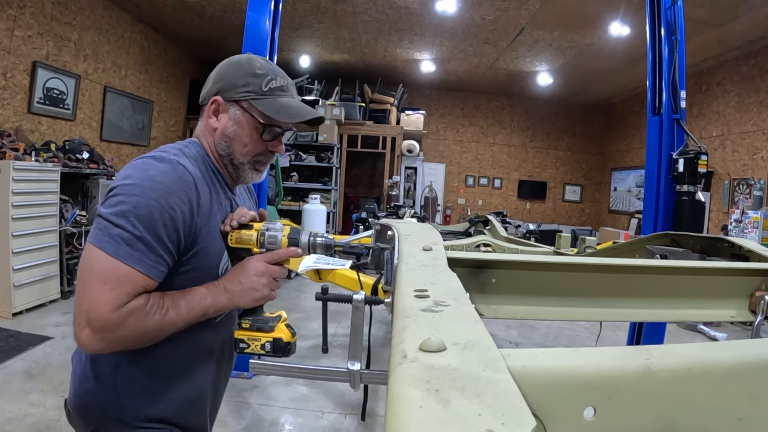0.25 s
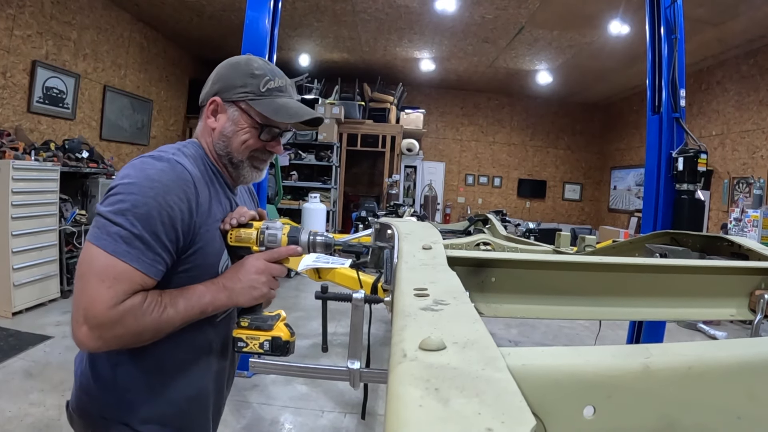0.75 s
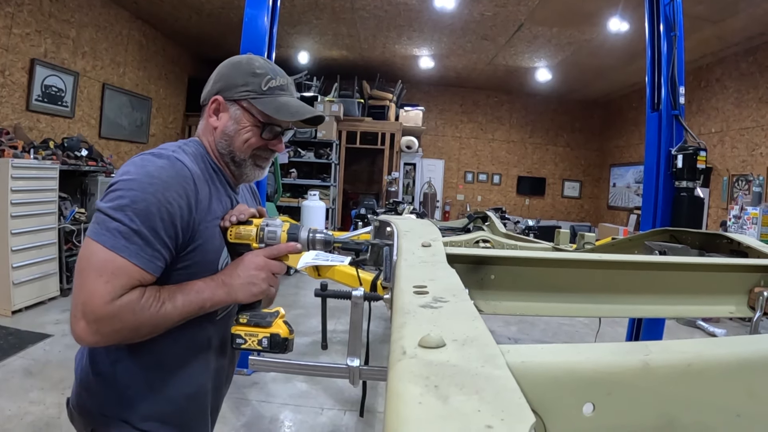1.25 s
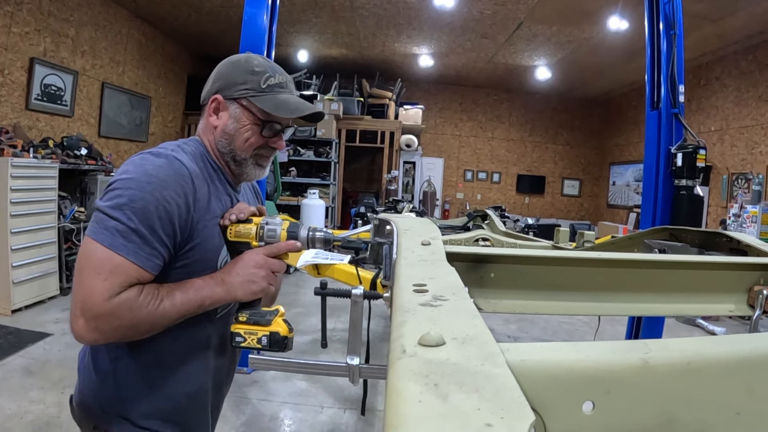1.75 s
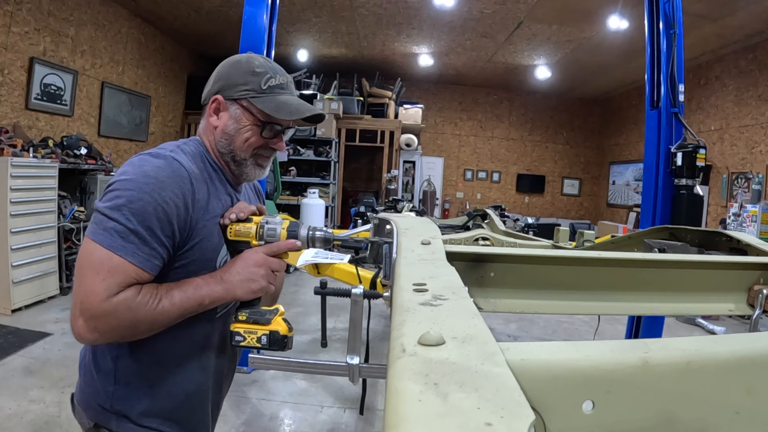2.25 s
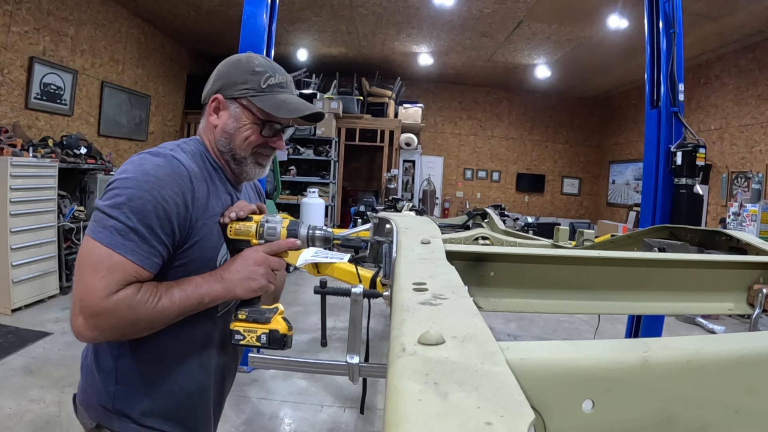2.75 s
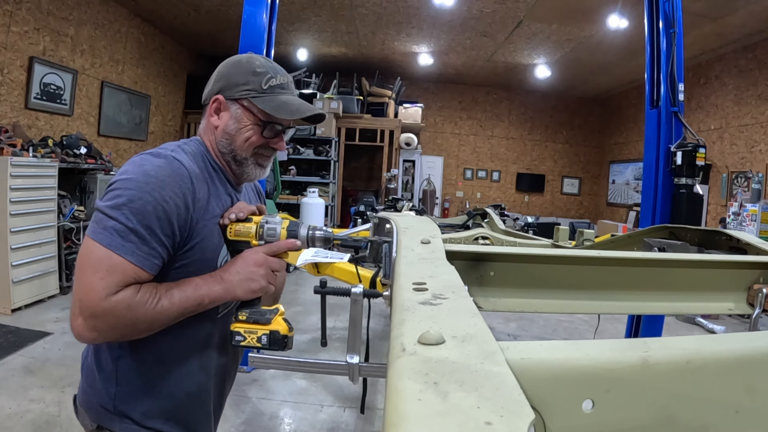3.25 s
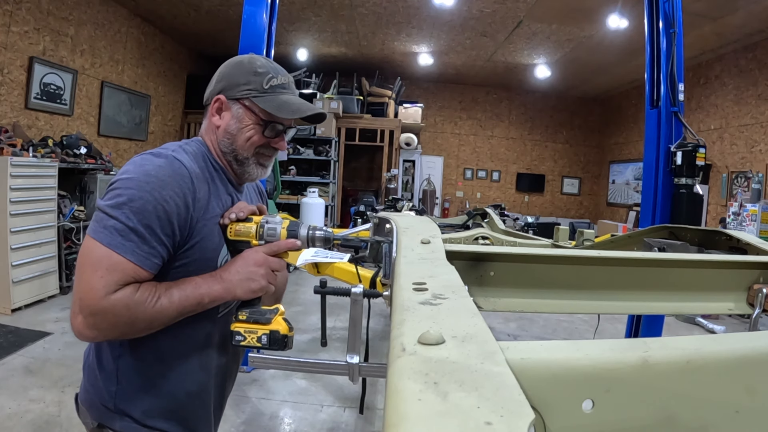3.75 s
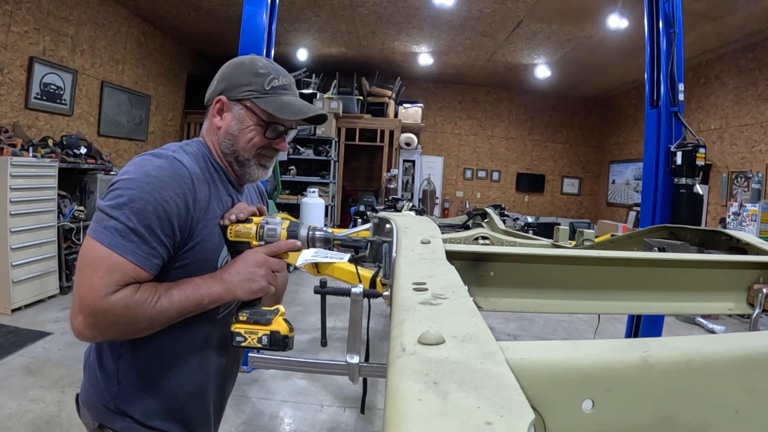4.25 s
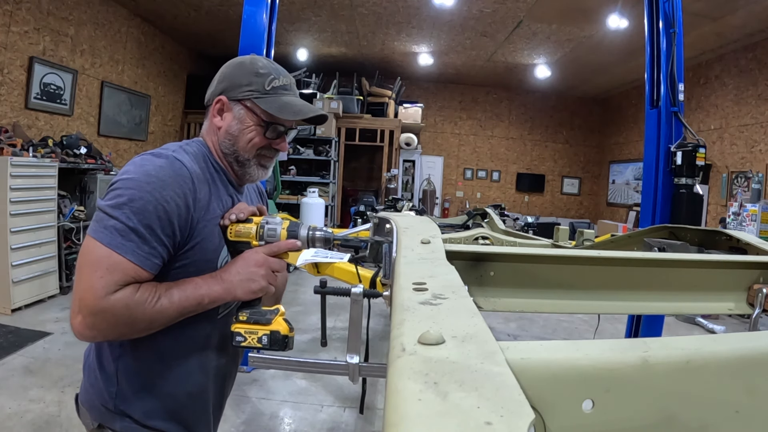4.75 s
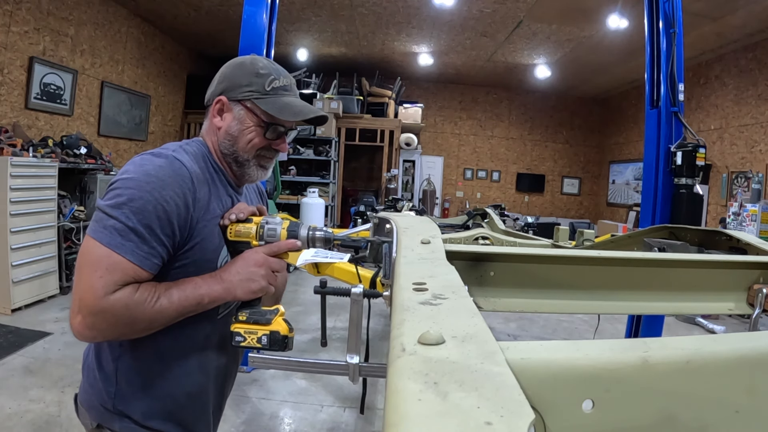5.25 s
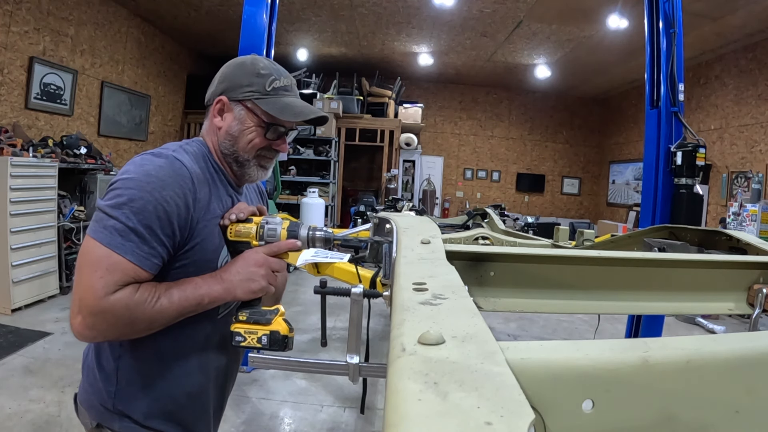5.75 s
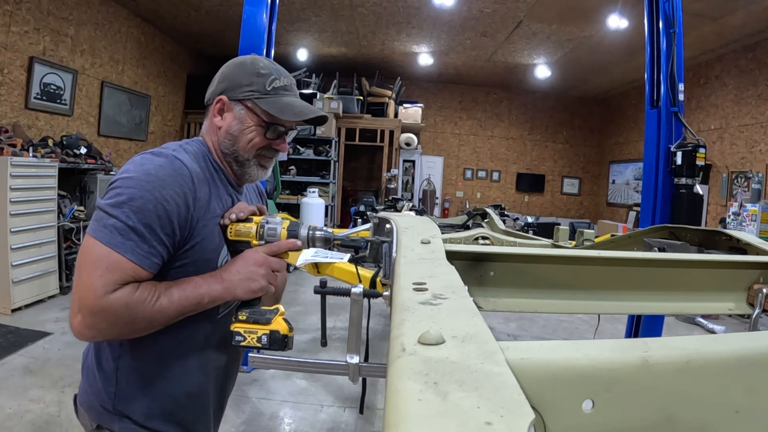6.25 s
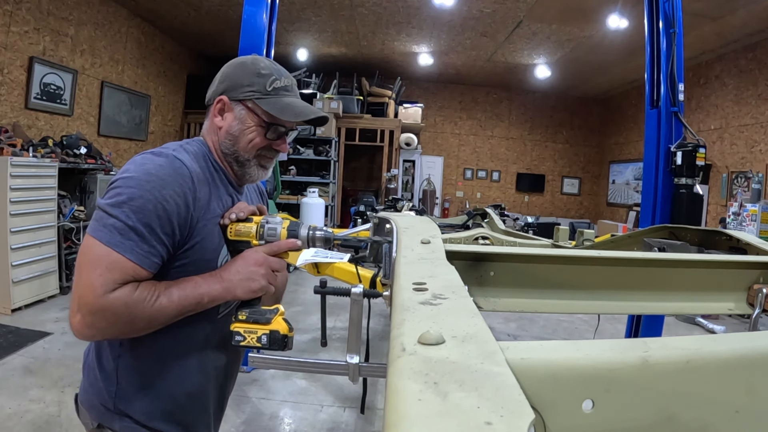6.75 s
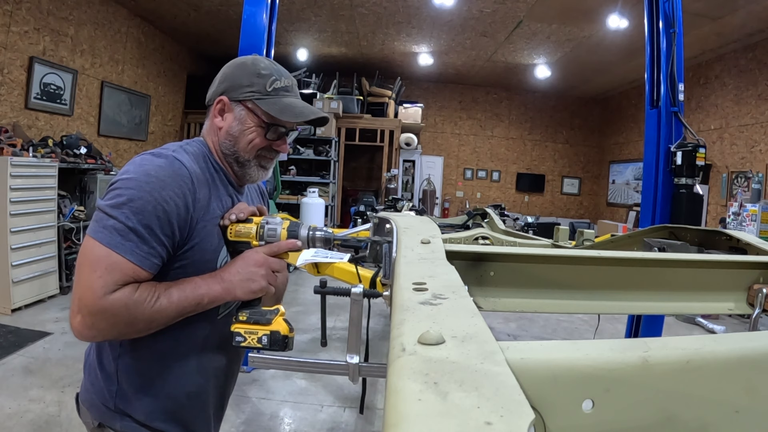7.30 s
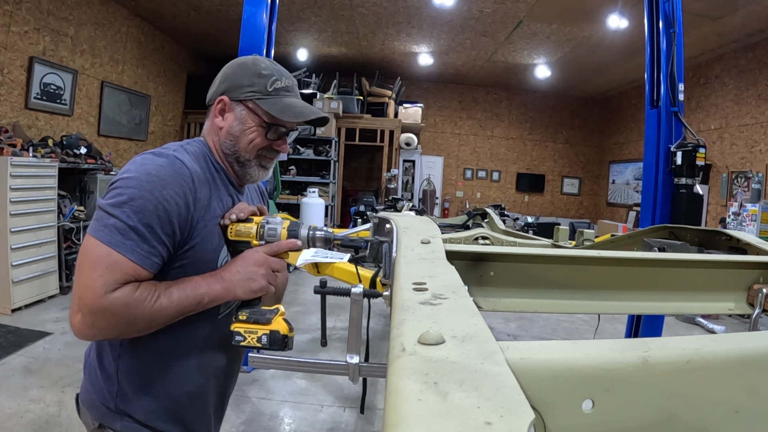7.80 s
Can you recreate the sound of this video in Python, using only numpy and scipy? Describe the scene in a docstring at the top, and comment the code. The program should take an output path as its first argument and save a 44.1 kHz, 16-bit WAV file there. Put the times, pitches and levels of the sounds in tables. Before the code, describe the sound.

A cordless drill starts at once, its motor whine sweeping up within about 0.3 seconds and then holding near full speed. At 0.1 seconds there is a hard, bright metallic clink as the bit bites, and a dull thump near 0.35. Dense gritty grinding follows without a break, a midrange ringing of the steel frame with rasp, hiss and sizzle. A high, jittery squeal near 5 kHz sinks slowly toward 4.4 kHz and grows louder. Around 3.8 to 4.6 seconds a rough shaving scrape dips and rises, with shrieks at 4.1 and a thump near 4.5. More grabs and shrieks come at 4.6 to 5.1, near 6, and most piercingly at 7.6, with a bright crackle. Drilling continues to the end at 8 seconds. Close, clipped sound on the left with short garage echo; faint boxy hum and noise on the right.

```python
"""Drill boring into steel

A cordless drill spins up and bores into a steel frame in a garage. Sines locked to the shaft make the whine;
showers of tiny random clicks, filtered, make the ringing, rasp and hiss of the cut; a jittery sine makes
the squeal, which comes in bursts and grows with depth. Shrieks, drones, scrapes, thumps and a clink join in.
The left channel is driven to its limit; the right holds only a faint boxy hum and a noise floor.
"""
import sys
import numpy as np
from scipy import signal
from scipy.fft import rfft, irfft, next_fast_len
from scipy.io import wavfile
from scipy.ndimage import uniform_filter1d, minimum_filter1d, map_coordinates

SR = 44100
rng = np.random.default_rng(int(sys.argv[2]) if len(sys.argv) > 2 else 0)


def inscribe(sig):
    """Save sig as 16-bit PCM at rate SR to the path in sys.argv[1].

    A 1-D sig is mono; a 2-D sig holds one channel per row.
    Samples are clipped to [-1, 1] before scaling.
    """
    pcm = np.round(np.clip(np.atleast_2d(sig).T, -1, 1) * 32767)
    wavfile.write(sys.argv[1], SR, pcm.astype(np.int16))


N = 354123
T = np.arange(N) / SR   # time of every sample, s
# Table levels are relative: the functions trim them and scene() sets the final loudness.


def from_db(db):
    """Turn decibels into a gain."""
    return 10 ** (np.asarray(db) / 20)


def rms_one(x):
    """Scale a sound to an average strength (rms) of 1."""
    return x / np.sqrt(np.mean(x ** 2) + 1e-20)


def in_time(rows):
    """Draw straight lines between a table's rows: each column at every sample."""
    s, *columns = np.transpose(rows)
    return [np.interp(T, s, column) for column in columns]


def drift(rate):
    """Smooth random wandering with about `rate` new values a second; rms 1."""
    knots = rng.standard_normal(N // 8)
    return rms_one(map_coordinates(knots, [T * rate], order=2, mode="wrap"))


def coloured(x, spectrum):
    """Filter x so that some pitches are louder than others, as the table says; rms 1."""
    hz, db = np.transpose(spectrum)
    size = next_fast_len(N, True)
    bins = np.maximum(np.arange(size // 2 + 1) * SR / size, 1)
    gain = from_db(np.interp(np.log(bins), np.log(hz), db))
    return rms_one(irfft(rfft(x, size) * gain, size)[:N])


def resonate(x, hz, width):
    """Let x ring one resonance: the narrower its width in Hz, the longer it rings; rms 1."""
    r = np.exp(-np.pi * abs(width) / SR)
    return rms_one(signal.lfilter([1, 0, -1], [1, -2 * r * np.cos(2 * np.pi * hz / SR), r * r], x))


def turns(per_s):
    """Angle in radians of something turning at this many turns per second."""
    return 2 * np.pi * np.cumsum(per_s) / SR


def phase_walk(width):
    """Random wandering of phase that smears a tone over about `width` Hz."""
    return turns(.5 * width * drift(3 * abs(width)))


def levelled(x, seconds):
    """Even out the strength over this time, keeping faster flutter."""
    return x / np.sqrt(np.abs(uniform_filter1d(x ** 2, max(int(seconds * SR), 8))) + 1e-9)


GARAGE_T60_S = 0.5   # time for the echo to fade by 60 dB


def garage(x, wet_db):
    """Direct sound plus the room: a dense, dying tail of reflections made from fading noise."""
    t = T[:SR // 2]
    tail = rng.standard_normal(len(t)) * from_db(-60 * t / GARAGE_T60_S) * (t > .004)
    return x + from_db(wet_db) * signal.fftconvolve(x, tail / np.linalg.norm(tail))[:N]


# speeds in turns per s: a ramp from the trigger pull, then a slow approach to the top
TOP_SPEED, START_SPEED, RAMP_PER_S = 387.6, 115, 1500
CREEP_SPEED, CREEP_S = 130, .165
WAVER_SPEED = 0.3525
GEAR_RATIO = 17.2   # rotor turns per spindle turn


def motor_speed():
    """Rotor turns per second: a quick ramp, a slow creep to the top and a slight random waver."""
    creep = TOP_SPEED - CREEP_SPEED * np.exp(-T / CREEP_S)
    return np.minimum(START_SPEED + RAMP_PER_S * T, creep) + WAVER_SPEED * drift(5)


def chips(bite, per_s, spread_db, wet_db):
    """Tiny fractures: random clicks of uneven size, as strong as the lips bite, in the garage."""
    born = rng.random(N) < per_s / SR
    sizes = from_db(spread_db * np.minimum(rng.exponential(1, N), 4)) * rng.choice([-1, 1], N)
    return garage(born * sizes * bite, wet_db)


# force of the cut: t/s, frame level/dB, rasp level/dB
CUT_FORCE = [(0.0, -41, -45), (0.09, -33.5, -32.5), (0.15, -30.5, -35.5), (0.44, -29, -32.5),
             (1.49, -28, -28), (2.78, -26.5, -28.5), (2.96, -28, -29.5), (3.01, -26, -28.5),
             (3.92, -26, -25), (4.03, -27.5, -29), (4.39, -26, -23.5), (5.3, -28, -28.5),
             (5.39, -29.5, -28), (5.64, -29.5, -30), (6.48, -26.5, -26.5), (6.66, -27.5, -27),
             (7.31, -26.5, -28.5), (8.0, -27, -23.5)]
# loudness of the treble, which flares briefly at 7.61 s: t/s, hiss level/dB, sizzle control level/dB
TREBLE_LEVELS = [(0.0, -59, -67), (0.11, -41.5, -51.5), (0.4, -39.5, -50.5), (2.22, -35.5, -47),
                 (3.46, -39.5, -49.5), (4.33, -34, -43), (4.53, -36.5, -47), (4.77, -33.5, -45.5),
                 (5.44, -38, -51), (5.64, -37.5, -50), (6.57, -40.5, -56.5), (7.06, -38.5, -52),
                 (7.59, -40, -52), (7.61, -39, -41), (7.7, -39, -51), (7.97, -38, -47)]
# body of the frame: f/Hz, level/dB per Hz
FRAME_BODY = [(25, -39), (75, -48), (160, -27.5), (280, -18), (420, -4.5), (620, -1), (800, 5), (1000, 2.5),
              (1450, 4.5), (1900, 2.5), (2200, -8), (2700, -26), (4000, -29)]
# ringing notes of the frame: f/Hz, width/Hz, level/dB relative to the body
FRAME_MODES = [(119.4, 6.6, -49.5), (237, 32, -47), (387, 15, -29.5), (477, 16, -31.5), (635, 26, -25.5),
               (813, 36, -15.5), (1650, 29, -31), (1936, 38, -40)]
# rasp in the hole: f/Hz, level/dB per Hz
RASP_SPECTRUM = [(1800, -51), (2700, -5.5), (2880, 0), (3200, -1), (3600, 3.5), (3950, -0.5), (4600, 0.5),
                 (5100, -3), (5600, -12), (6500, -36)]
# growl of the cut: f/Hz, level/dB per Hz
GROWL_SPECTRUM = [(1400, -43), (1950, 8), (2100, 6), (2280, 4), (2480, 8.5), (2680, -1.5), (2850, 6),
                  (3100, 4.5), (3800, -26)]
# hiss: f/Hz, level/dB per Hz
HISS_SPECTRUM = [(3500, -21), (5000, 7.5), (5700, 4), (6500, 1.5), (8200, 1), (9400, -8.5), (11000, -32),
                 (16000, -35)]
# sizzle, the highest part: f/Hz, level/dB per Hz
SIZZLE_SPECTRUM = [(7000, -14), (9500, 8), (12500, 7), (14000, 6), (16000, -14)]
# growl and sizzle both follow the sizzle control: level at its median (dB), share of its swing
GROWL_DB, GROWL_FOLLOWS = -32, 0.8
SIZZLE_DB, SIZZLE_FOLLOWS = -50, 1.6


def grinding(speed):
    """Two lips bite per spindle turn; clicks ring the frame, rasp in the hole, growl, hiss and sizzle."""
    frame_db, rasp_db = in_time(CUT_FORCE)
    hiss_db, control_db = in_time(TREBLE_LEVELS)
    swing_db = control_db - np.median(control_db)
    growl_db = GROWL_DB + GROWL_FOLLOWS * swing_db
    sizzle_db = SIZZLE_DB + SIZZLE_FOLLOWS * swing_db

    rotor = turns(speed)
    spindle = rotor / GEAR_RATIO
    spindle_db = 0.3 * np.sin(spindle) + 0.29 * np.sin(2 * spindle)
    bite = from_db(spindle_db + 0.48 * np.sin(rotor) + 0.67 * drift(30))

    blows = chips(bite, per_s=7000, spread_db=2.5, wet_db=-6.5)
    frame = coloured(blows, FRAME_BODY)
    for hz, width, db in FRAME_MODES:
        frame = frame + from_db(db) * resonate(blows, hz, width)

    scrapes = chips(bite, per_s=9000, spread_db=3.5, wet_db=-8)
    # the louder the hiss, the more unevenly it chatters
    chatter = from_db(np.clip(hiss_db + 39, 0, 9) * 0.073 * drift(130))
    dense_clicks = chips(bite * chatter, per_s=14000, spread_db=2.5, wet_db=-8.5)

    ringing = from_db(frame_db + 1.08) * frame
    rasp = from_db(rasp_db + 3.5) * coloured(scrapes, RASP_SPECTRUM)
    growl = from_db(growl_db) * coloured(dense_clicks, GROWL_SPECTRUM)
    hiss = from_db(hiss_db + 2.5) * coloured(dense_clicks, HISS_SPECTRUM)
    sizzle = from_db(sizzle_db) * coloured(scrapes, SIZZLE_SPECTRUM)
    return ringing + rasp + growl + hiss + sizzle


# brief dips of the 8th order: t/s of the middle, length/s
DROPOUTS = [(0.818, .11), (.97, .09), (1.31, .07), (1.49, 0.057), (1.7, 0.049), (1.827, 0.048),
            (2.53, 0.062), (3.3, 0.097), (3.53, 0.074), (4.161, 0.077), (4.44, .08), (5.348, 0.15),
            (5.85, .1), (6.24, 0.073), (6.85, .1), (7.66, .09)]
DROPOUT_DB = -7
# light pulses: rate, spread of the rate, depth 0-1
PULSE_HZ, PULSE_SPREAD_HZ, PULSE_DEPTH = 8.7, 7.8, 0.2


def pulsing():
    """Gain of the 8th order: light uneven pulses and a few deeper dropouts."""
    wave = np.sin(2 * np.pi * PULSE_HZ * T + phase_walk(PULSE_SPREAD_HZ))
    light = 1 - PULSE_DEPTH * np.maximum(wave, 0) ** 2
    gone = sum(np.exp(-2 * (2 * (T - s) / length) ** 2) for s, length in DROPOUTS)
    return light * from_db(DROPOUT_DB * gone)


# loudness of the whine (order = cycles per rotor turn): t/s, 4th order level/dB, 8th order level/dB
WHINE_LEVELS = [(0, -58, -45), (.1, -30.5, -45), (.24, -33, -38), (.42, -32, -34.5), (.52, -32.5, -28),
                (.9, -30.5, -31), (2.7, -31, -30.5), (3.3, -29.5, -29), (3.8, -32, -29.5),
                (3.95, -30, -25.5), (4.12, -37.5, -36), (4.35, -33, -28.5), (4.63, -32.5, -29.5),
                (4.85, -39.5, -31), (5.7, -37.5, -33.5), (6.6, -39, -35), (6.93, -29.5, -34),
                (7.1, -42, -32), (7.75, -39, -38.5), (8.03, -34, -27.5)]
# lesser tones of rotor and gears: multiple of motor speed, level/dB relative to 4th order, width/Hz
GEAR_TONES = [(3, -25, 8.2), (4.652, -7, 12), (7.408, -26, 7.2), (9.235, -6.5, 32), (12, -22, 14)]


def whine(speed):
    """Motor and gear tones locked to one shaft, trembling with the load at every spindle turn."""
    fourth_db, eighth_db = in_time(WHINE_LEVELS)
    load = np.sin(turns(speed) / GEAR_RATIO)
    rotor = turns(speed * (1 + 0.0014 * drift(22) + 0.0047 * load))
    fourth = levelled(garage(np.sin(4 * rotor), wet_db=-6), seconds=0.12)
    flutter = from_db(1.9 * drift(70) + 1.3 * load)
    eighth = levelled(garage(np.sin(8 * rotor) * flutter, wet_db=-7), seconds=.04)
    gears = np.zeros(N)
    for multiple, db, width in GEAR_TONES:
        gears += np.sqrt(2) * from_db(db) * np.sin(multiple * rotor + phase_walk(width))
    # the gears only sing out near full speed
    gears = gears * from_db(1.3 * drift(25) + 2.7 * load) * (speed / speed.max()) ** 10
    return from_db(fourth_db + 1.25) * (fourth + gears) + from_db(eighth_db + 4.0) * pulsing() * eighth


# steady squeal of the bit, growing as it goes deeper: t/s, level/dB
SQUEAL_LEVEL = [(0, -66), (.11, -32), (.55, -28), (1.8, -27.5), (3.0, -25), (3.65, -21.5), (3.95, -28.5),
                (4.09, -34), (4.3, -24), (5.25, -24), (5.45, -21.5), (6.65, -19.5), (7.08, -24.5),
                (7.3, -18.5), (7.55, -22.5), (7.75, -17.5), (8.03, -17.5)]
# its pitch sinks with depth: t/s, f/Hz
SQUEAL_PITCH = [(0, 4955), (1.0, 4870), (1.9, 4735), (3.6, 4715), (4.1, 4660), (5.15, 4670), (5.45, 4560),
                (5.85, 4590), (6.3, 4490), (6.95, 4590), (7.3, 4450), (7.55, 4540), (8.03, 4430)]
# the bit grabs and the squeal jumps: t/s, length/s, level/dB, f/Hz
GRABS = [(4.107, 0.13, -17.5, 4560), (4.618, .09, -18, 4650), (4.806, .125, -18, 4634),
         (4.98, 0.0598, -16.5, 4640), (5.691, .08, -18.5, 4525), (5.955, .185, -18.5, 4485),
         (6.342, .14, -17.5, 4360), (7.381, .09, -14.5, 4643), (7.616, .07, -12.5, 4340),
         (7.859, .07, -14, 4550), (8.012, .05, -14, 4415)]
GRAB_ATTACK_S, GRAB_RELEASE_S = 0.00802, .025
# the pitch is steadiest at the bit's own note and scatters more the farther it is pulled from it
STEADY_HZ, SCATTER_HZ, SCATTER_PER_HZ, MAX_SCATTER_HZ = 4720, 47.76, 0.511, 148.9


def squeal_controls():
    """Level, pitch and scatter of the squeal; each grab pulls level and pitch to its own for a moment."""
    (level_db,), (pitch,) = in_time(SQUEAL_LEVEL), in_time(SQUEAL_PITCH)
    for s, length, db, hz in GRABS:
        corners = [s - GRAB_ATTACK_S, s, s + length, s + length + GRAB_RELEASE_S]
        grip = np.interp(T, corners, [0, 1, 1, 0])
        level_db = level_db + grip * (db - level_db)
        pitch = pitch + grip * (hz - pitch)
    scatter = np.minimum(SCATTER_HZ + SCATTER_PER_HZ * np.abs(pitch - STEADY_HZ), MAX_SCATTER_HZ)
    return level_db + 1.15 * drift(28), pitch, scatter


# ringing notes of the bit: f/Hz, width/Hz, level/dB relative to the stick-slip tone
BIT_MODES = [(4315, 47, -12), (4520, 30, -13), (4665, 23, -4.5)]


def squeal(speed):
    """The bit sticks and slips near its own notes: a sine of scattered pitch in short bursts rings the bit."""
    level_db, pitch, scatter = squeal_controls()
    spindle = turns(speed) / GEAR_RATIO
    spindle_db = 0.5 * np.sin(2 * spindle) + 2.9 * np.sin(4 * spindle)
    bursts = from_db(4.4 * drift(260) + 1.5 * drift(70) + spindle_db)
    jittered_pitch = pitch + scatter * (drift(500) + 0.402 * drift(60))
    sticking = rms_one(bursts * np.sin(turns(jittered_pitch)))
    ringing = sum(from_db(db) * resonate(sticking, hz, width) for hz, width, db in BIT_MODES)
    return from_db(level_db - 0.15) * levelled(garage(sticking + ringing, wet_db=4.5), seconds=0.06)


# the bit locks into a clean shriek: t/s, length/s, f/Hz, peak level/dB before the echo
SHRIEKS = [(4.121, .016, 4580, -15), (4.151, 0.012, 4520, -13), (4.632, 0.035, 4660, -12),
           (4.818, 0.0081, 4684, -9.5), (5.074, 0.019, 4670, -8), (5.964, .018, 4500, -12.5),
           (6.053, 0.017, 4500, -10.5), (7.603, 0.0096, 4345, -9), (7.623, 0.018, 4300, -6.5),
           (7.655, .006, 4380, -15), (7.67, 0.0084, 4340, -6)]


def shrieks():
    """Now and then the slip locks in and the bit sings a nearly pure tone."""
    out, waver = np.zeros(N), phase_walk(70)
    for s, length, hz, db in SHRIEKS:
        # 3 ms more at each end leave room to fade
        at = (T > s - .003) & (T < s + length + .003)
        swell = signal.windows.tukey(at.sum(), .55)
        out[at] += from_db(db) * swell * np.sin(2 * np.pi * hz * T[at] + waver[at])
    return garage(out, wet_db=-9.0)


# resonances held by the rubbing bit: start t/s, end t/s, f/Hz, width/Hz, level/dB
DRONES = [(0.3, 2.6, 926, 16, -41), (1.3, 3.1, 793, 36, -36), (2.7, 4.2, 802, 24, -30.5),
          (2.8, 4.8, 8920, 110, -42.5), (2.3, 6.8, 9020, 140, -53.5), (2.9, 4.4, 3680, 160, -37),
          (4.27, 4.5, 3490, 250, -28), (4.5, 5.1, 2850, 35, -33), (4.7, 5.05, 2580, 70, -34),
          (4.5, 5.25, 654, 8, -37.5), (5.35, 6.0, 840, 14.5, -36), (6.5, 7.84, 632.6, 13.8, -36.5),
          (6.65, 7.25, 1576, 62, -31.5), (6.9, 7.3, 1052, 39.5, -34.5), (7.6, 8.1, 229, 7.7, -56.5)]


def drones():
    """The rubbing bit keeps one resonance going for a while, then another; some overlap."""
    out, swell = np.zeros(N), drift(18)
    for start, end, hz, width, db in DRONES:
        at = (T > start) & (T < end)
        arch = np.sqrt(np.abs(np.sin(np.pi * (T[at] - start) / (end - start))))
        tone = np.sin(2 * np.pi * hz * T[at] + phase_walk(width)[at])
        out[at] += np.sqrt(2) * from_db(db + 3.0 * swell[at]) * arch * tone
    return out


# weaker resonances deep in the hole: f/Hz, width/Hz, level/dB
DEEP_MODES = [(811, 40, -42.5), (1074, 100, -38.5), (1130, 14, -40.5)]
DEEP_FROM_S, DEEP_FADE_S, DEEP_SWELL_DB, DEEP_SWELLS_PER_S = 3.6, 0.54, 2, 2.567


def deep_rubbing():
    """Once the bit is deep, its flanks rub a few more resonances, which swell and fade by chance."""
    depth = np.clip((T - DEEP_FROM_S) / DEEP_FADE_S, 0, 1)
    out = np.zeros(N)
    for hz, width, db in DEEP_MODES:
        swell = from_db(db + DEEP_SWELL_DB * drift(DEEP_SWELLS_PER_S))
        out += swell * np.sin(2 * np.pi * hz * T + phase_walk(width))
    return np.sqrt(2) * depth * out


# a curl of swarf (metal shaving) scrapes round the hole: t/s, base f/Hz, level/dB
SWARF_PATH = [(3.8, 8340, -80), (3.95, 7550, -38), (4.1, 6832, -36), (4.22, 6250, -31), (4.35, 6730, -33),
              (4.45, 7510, -43), (4.6, 7940, -78)]


def swarf():
    """Three rough tones of the curl sink as it grows and rise as it tears away."""
    hz, db = in_time(SWARF_PATH)
    scrape = sum(np.sin(turns(ratio * hz) + phase_walk(750)) for ratio in (1.02, 1.17, 1.3))
    return from_db(db - 2.5 + 2.6 * drift(180)) * scrape


# short dull low thumps: t/s, level/dB, pitch as a multiple of the spectrum below
THUMPS = [(0.116, -53, .3), (0.345, -41, 1.05), (4.485, -37, 1.0), (4.54, -46, .95), (7.611, -50, .42),
          (8.01, -44, 1.05)]
# spectrum of a thump: f/Hz, level/dB per Hz
THUMP_SPECTRUM = [(30, -13), (110, -9), (220, -9), (320, 12), (450, -4), (900, -27)]


def thumps(t60=0.18):
    """Each thump is filtered noise that dies away."""
    out, noise = np.zeros(N), rng.standard_normal(N)
    for s, db, pitch in THUMPS:
        envelope = from_db(db - 60 * np.maximum(T - s, 0) / t60) * (T >= s)
        shifted = [(hz * pitch, level) for hz, level in THUMP_SPECTRUM]
        out += envelope * coloured(noise, shifted)
    return out


# the chuck takes up the load: time, then a ring and a crack; T60 is the time to fade by 60 dB
CLINK_S = .1155
CLINK_HZ, CLINK_WIDTH_HZ, CLINK_DB, CLINK_T60_S = 13800, 420, -11.5, .06
CRACK_DB, CRACK_T60_S, CRACK_LOW_HZ = -27, .05, 7000


def clink():
    """One hard metal contact: a high ring and a short bright crack of noise."""
    age, struck = np.maximum(T - CLINK_S, 0), T >= CLINK_S
    tone = np.sin(2 * np.pi * CLINK_HZ * T + phase_walk(CLINK_WIDTH_HZ))
    ring = from_db(CLINK_DB - 60 * age / CLINK_T60_S) * tone
    highpass = signal.butter(2, CRACK_LOW_HZ, "high", fs=SR, output="sos")
    bright = signal.sosfilt(highpass, rng.standard_normal(N))
    crack = from_db(CRACK_DB - 60 * age / CRACK_T60_S) * rms_one(bright)
    return garage(struck * (ring + crack), wet_db=-16)


HUM_DB, HUM_WIDTH_HZ = -48.5, 3


def rotor_hum(speed):
    """The rotor's imbalance hums at its own speed, whatever the load, and sings out only near full speed."""
    tone = np.sin(turns(speed) + phase_walk(HUM_WIDTH_HZ))
    return np.sqrt(2) * from_db(HUM_DB) * (speed / TOP_SPEED) ** 10 * tone


# faint boxy hum on the right: f/Hz, width/Hz (doubled below, for two passes), level/dB
BOXY_MODES = [(226, 25, -68.5), (307, 11, -77), (355, 14, -70.5), (366, 14, -64), (492, 15, -72),
              (547, 22, -61), (645, 25, -82), (708, 25, -72)]


def boxy_hum():
    """Noise rings a few low resonances, whose loudness follows the shaking of the frame."""
    frame_db = in_time(CUT_FORCE)[0]
    shaking = rng.standard_normal(N)
    hum = np.zeros(N)
    for hz, width, db in BOXY_MODES:
        once = resonate(shaking, hz, 2 * width)
        hum += from_db(db) * resonate(once, hz, 2 * width)
    return hum * from_db(.7 * (frame_db - np.median(frame_db)))


# steady background noise: f/Hz, level/dB per Hz
FLOOR_SPECTRUM = [(15, 4), (30, -24), (70, -26), (800, -22.5), (3000, -31.5), (8000, -38), (16000, -38)]


def noise_floor():
    """Filtered random noise, separate for each channel."""
    return np.array([coloured(rng.standard_normal(N), FLOOR_SPECTRUM) for side in range(2)])


def scene():
    """The drill on the left, the faint hum on the right, a noise floor in both."""
    speed = motor_speed()
    drill = grinding(speed) + whine(speed) + squeal(speed) + shrieks()
    drill = drill + drones() + deep_rubbing() + swarf()
    drill = drill + thumps() + clink() + rotor_hum(speed)
    return np.array([from_db(5.5) * drill, boxy_hum()]) + from_db(-61.5) * noise_floor()


CUTOFF_HZ = 15750


def record(dry):
    """A fast limiter holds the loudest bursts, what passes it is clipped, and the top is cut."""
    ceiling = 1.28
    gain = minimum_filter1d(ceiling / np.maximum(np.abs(dry), ceiling), size=65)
    held = np.clip(dry * uniform_filter1d(gain, size=65), -.98, .98)
    lowpass = signal.ellip(12, .1, 80, CUTOFF_HZ, fs=SR, output="sos")
    return signal.sosfilt(lowpass, held)


dry = scene()
out = record(dry)
inscribe(out)
```